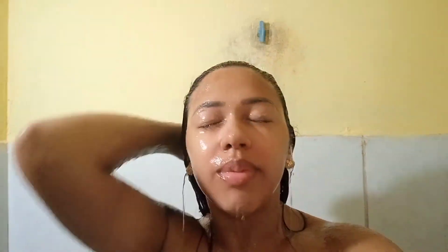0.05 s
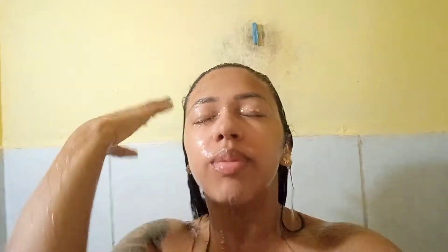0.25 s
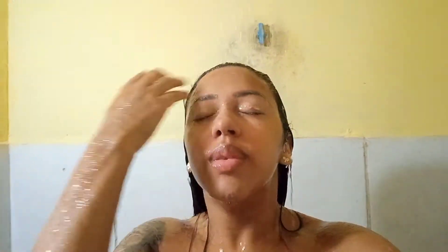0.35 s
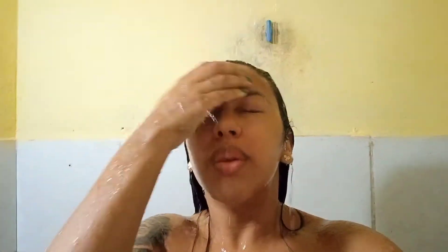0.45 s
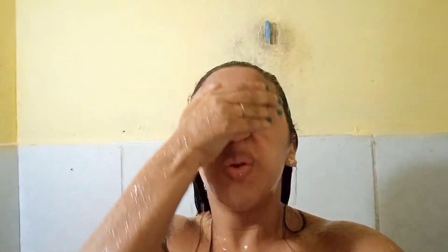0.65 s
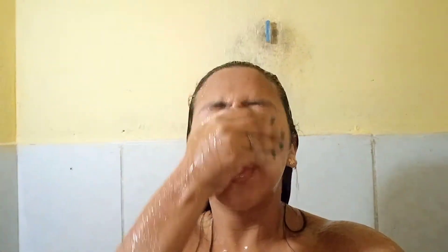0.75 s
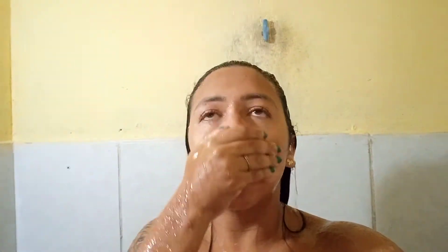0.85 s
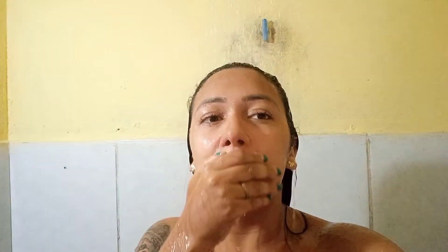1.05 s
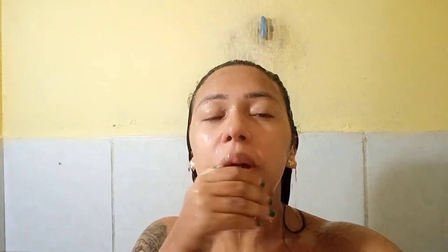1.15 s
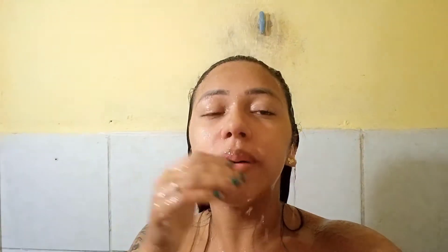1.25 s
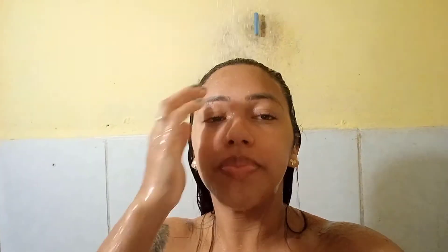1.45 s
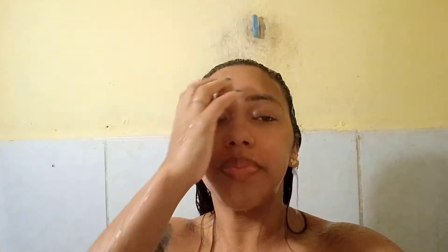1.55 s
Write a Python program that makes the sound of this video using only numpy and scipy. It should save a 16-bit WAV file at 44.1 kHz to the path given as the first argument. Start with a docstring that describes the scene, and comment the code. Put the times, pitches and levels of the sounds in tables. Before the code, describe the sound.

Close stereo pickup of a shower running over someone: thin crackling spray, an abrupt splash of shed water near the start, another splashy swell midway, then gurgling drips and a faint squelch, ringing off hard walls.

```python
"""A small tiled bathroom: shower water falls near a two-port phone. A fine spray patters throughout, built from
random clicks and hiss; water shed from hair, arm and hand lands in splats and one heavy slosh, both made of click
clusters. Air pockets ring as rising sines and a wet palm squelches over the face as filtered patter.
The hard walls ring on as decaying noise, unrelated at the two ports except in the bass; the shower corner hums
over a faint low rumble."""
import sys
import numpy as np
from scipy import signal
from scipy.fft import rfft, irfft, next_fast_len
from scipy.io import wavfile
from scipy.ndimage import uniform_filter1d

SR = 44100
rng = np.random.default_rng(int(sys.argv[2]) if len(sys.argv) > 2 else 0)


def log_audio(samples):
    """Write samples as a 16-bit WAV file to the path given in sys.argv[1]."""
    # one column per channel
    frames = np.atleast_2d(samples).T
    # limit to full scale, then quantise
    limited = np.clip(frames, -1, 1)
    pcm = np.round(limited * 32767).astype(np.int16)
    wavfile.write(sys.argv[1], SR, pcm)


def elevation(decibels):
    """Turn decibel levels (scalar or array-like) into linear amplitude ratios."""
    levels = np.asarray(decibels, float)
    return 10 ** (levels / 20)


N = 70560  # length [samples]
T = np.arange(N) / SR  # [s]
SIZE = next_fast_len(2 * N)  # transform length, with space for the echoes
HZ = np.maximum(np.arange(SIZE // 2 + 1) * SR / SIZE, 1)

# spray strength ahead of the room, as the body moves under the jet: (time [s], level [dB])
SPRAY_STRENGTH = [(0.0, -40.5), (.13, -39), (0.186, -30.5), (0.316, -55), (.54, -36.5), (.65, -34),
                  (.69, -27), (0.81, -35), (.95, -34.5), (1.158, -33), (1.354, -37), (1.46, -35),
                  (1.6, -40.5)]
# spray colour: (frequency [Hz], relative gain [dB])
SPRAY_COLOUR = [(180, -22), (300, -26.5), (450, -23), (638, -18), (793, -15.5), (1000, -17), (1550, -8),
                (3840, -11), (7130, -4), (8020, -11.5), (13300, -1), (15400, -7.5), (16500, -20)]
DROPS_PER_S, DROP_SPREAD_DB = 2500, 3.5
HISS_DB, FLICKER_DB = -12.5, 5  # hiss against the drops; spread of the flicker

# decay of the room: (frequency [Hz], time to fall 60 dB [s])
ROOM_DECAY = [(200, 0.46), (800, 0.56), (3000, 0.5), (7000, 0.38), (13000, 0.65)]
ROOM_BUILD_S, SHARED_BELOW_HZ = 0.0019, 695
EARLY_DB, EARLY_S = -9.5, 0.0021  # nearest tiles: level ahead of the build-up, decay time
NICHE_HZ, NICHE_WIDTH_HZ, NICHE_DB = 768.7, 21, -7  # air resonance of the shower corner
MODE_HZ, MODE_WIDTH_HZ, MODE_DB = 234.5, 15, 7.5  # low standing wave between the walls

# hum of the corner, kept going by the falling stream: (time [s], level before the sway [dB])
HUM_STRENGTH = [(0.0, -60), (0.222, -59), (0.27, -36.5), (0.49, -71), (0.646, -45.5), (0.73, -70.5),
                (1.154, -51), (1.256, -63.5), (1.558, -55), (1.6, -61)]
HUM_WIDTH_HZ, HUM_SWAY_DB = 69, 4.5  # width of each of two filter passes

# rumble of building and pipes: (frequency [Hz], relative gain [dB])
RUMBLE_COLOUR = [(15, -46), (25, -16), (65, -5), (188, -14), (246, 0), (314, -10), (400, -13), (520, -43),
                 (880, -120)]
RUMBLE_DB = -66  # before its slow sway

# splats of shed water on the tiles, ahead of the direct and room paths:
# (time [s], level [dB], centre [Hz], width [share of centre], length [s])
TILE_SPLATS = [(0.015, -37.5, 11600, 0.17, 0.002), (.145, -39, 7430, 0.1, 0.0097),
               (.146, -32.5, 12600, 0.33, 0.0085), (0.19, -31, 12000, 0.22, 0.0017),
               (.202, -29.5, 12000, 0.41, 0.0027), (.203, -29.5, 4560, 0.82, 0.021),
               (.22, -40, 4970, 2.3, 0.012), (0.21, -28, 7200, 0.17, 0.016),
               (0.231, -18.5, 12700, 4.2, .006), (.256, -18, 13160, 0.26, 0.0014),
               (0.559, -34, 12100, 0.12, 0.0027), (.573, -41, 11900, 0.28, .002),
               (.600, -37.5, 12900, .3, 0.0015), (0.593, -27.5, 4340, 0.63, 0.039),
               (0.674, -21, 12000, 1.55, 0.022), (0.705, -25, 6900, 3.9, 0.0056),
               (.768, -27.5, 4100, 1.5, 0.0016), (.776, -29.5, 4310, .35, 0.018),
               (0.772, -25.5, 12900, 0.26, 0.00099), (0.804, -25.5, 12000, 3, .004),
               (.850, -26.5, 13400, 0.68, 0.0033), (0.957, -30.5, 12150, 0.34, 0.0035),
               (0.976, -33, 7200, 0.36, 0.0048), (1.088, -33, 13300, 0.2, 0.0026),
               (1.113, -35.5, 2800, 0.88, 0.0055), (1.15, -30.5, 11700, 0.66, 0.0024),
               (1.276, -48, 3780, 0.16, 0.011), (1.297, -32.5, 6460, 0.24, 0.021),
               (1.344, -26, 13100, 1.1, 0.002), (1.472, -24, 9650, 1.13, 0.056),
               (1.494, -35.5, 5100, 0.56, 0.005), (1.395, -32, 12300, 0.27, 0.0046),
               (1.530, -32.5, 12500, 0.99, .006), (1.570, -28.5, 12500, 0.97, 0.0026)]
SPLAT_GRAINS_PER_S, SPLAT_SPREAD_DB = 7000, 0.5
SPREAD_S = 0.0026  # longest time constant of a cluster's swell
FIRST_DROP_DB = -7  # energy of the leading drop against its cluster
SPLAT_DIRECT_DB = -3

# air pockets, ahead of the direct and room paths:
# (time [s], level [dB], starting pitch [Hz], time to fall 60 dB [s], swell [s])
AIR_POCKETS = [(.143, -39.5, 1453, 0.18, .002), (.146, -32.5, 2520, 0.014, 0.0012),
               (.172, -32.5, 2420, .02, 0.0015), (.689, -25, 2608, 0.037, 0.0025),
               (.904, -32, 2340, 0.024, 0.0024), (1.051, -39, 1000, 0.038, 0.014),
               (1.078, -39, 1200, 0.044, 0.0033), (1.075, -40, 327, 0.06, 0.027),
               (1.121, -34.5, 397, 0.028, 0.0014), (1.123, -31.5, 2450, 0.032, 0.0022),
               (1.129, -33, 3540, .02, 0.0015), (1.142, -31.5, 1410, 0.027, 0.0016),
               (1.152, -36, 498, 0.037, 0.0034), (1.160, -38.5, 1560, 0.076, 0.007),
               (1.170, -35.5, 1668, 0.057, .002), (1.175, -40, 560, .04, .003),
               (1.186, -33, 1680, 0.018, 0.0018), (1.236, -46.5, 514, 0.15, 0.003),
               (1.257, -40.5, 1393, 0.037, .002), (1.278, -36.5, 3820, .03, 0.0015),
               (1.287, -34, 3730, 0.036, 0.0012), (1.385, -36, 1525, 0.027, 0.0015),
               (1.460, -43.5, 2170, 0.053, 0.0049)]
BUBBLE_RISE = 0.14  # glide strength: pitch climbs by twice this share
BUBBLE_DIRECT_DB, BUBBLE_ROOM_DB = -2, -7  # sends, also used for the squelch

# lumps of water in the heavy slosh off the raised arm: (time [s], gain [dB], length [s])
SLOSH_LUMPS = [(0.2474, -11.5, 0.01), (0.268, -10, 0.0098), (0.285, -33, 0.0046)]
# slosh colour: (frequency [Hz], relative gain [dB])
SLOSH_TONE = [(88, -36), (150, -27), (299, -27), (409, -18.5), (669, -6), (767, -3.5), (880, -10),
              (1140, -12.5), (2920, 1), (3450, 0), (4300, 3), (5590, -1), (6810, 3.5), (8130, -4.5),
              (15000, -3), (16500, -42)]

# wet palm: centre time, half-width of the swell, level ahead of swell and sends, pitch region
SQUELCH_S, SQUELCH_LEN_S, SQUELCH_DB, SQUELCH_HZ = 1.151, 0.053, -44.5, 470

SPOTS = 4  # landing places, each with its own echoes
# colour difference of the ports: (frequency [Hz], left minus right [dB])
PORT_DIFFERENCE = [(60, 3), (110, 0), (200, 0.5), (380, 2), (700, -2.5), (1290, -6), (2380, -6.0),
                   (4400, -7), (8120, -5.5), (15000, -9.5)]
TOP_HZ = 16050  # nothing passes above


def level(x, db):
    """Scale to an rms level."""
    return x * elevation(db) / np.sqrt(np.mean(x ** 2))


def on_hz(table):
    """Read (frequency [Hz], value) points on a log-frequency axis."""
    f, v = np.array(table, float).T
    return np.interp(np.log(HZ), np.log(f), v)


def shape(x, gain):
    """Apply a frequency response."""
    return irfft(rfft(x, SIZE) * gain, SIZE)[..., :N]


def band(hz, width_hz):
    """Causal resonance, gain 1 at the centre."""
    return 1 / (1 + 1j * (HZ / hz - hz / HZ) * hz / width_hz)


def octave(hz):
    """Soft bell about an octave wide, gain 1 at the centre."""
    return np.exp(-np.log2(HZ / hz) ** 2 * 2)


def patter(per_s, spread_db):
    """Random droplet clicks with a long tail of big ones; rms 1."""
    hit, size, sign = rng.random((3, N))
    clicks = (hit < per_s / SR) * elevation(-spread_db * np.log(size + 1e-9))
    return level(clicks * np.sign(sign - .5), 0)


def walk(rate):
    """Slow random wander, spread near 1, with rate new values a second."""
    k = int(SR / rate)
    steps = np.repeat(rng.standard_normal(N // k + 1), k)
    return np.sqrt(1.5) * uniform_filter1d(steps, k)[:N]


def spray():
    """Fine drops and hiss; octave bands flicker on their own."""
    out = 0
    for hz in 250 * 2. ** np.arange(7):
        raw = patter(DROPS_PER_S, DROP_SPREAD_DB) + elevation(HISS_DB) * rng.standard_normal(N)
        out = out + shape(raw, octave(hz)) * elevation(FLICKER_DB * walk(14.19))
    t, db = np.array(SPRAY_STRENGTH).T
    coloured = level(shape(out, elevation(on_hz(SPRAY_COLOUR))), 0)
    return coloured * elevation(np.interp(T, t, db))


def room():
    """Responses to the two ports: a quick flutter off the nearest tiles, then a tail that decays band by band."""
    shared, own = rng.standard_normal(N), rng.standard_normal((2, N))
    mix = 1 / (1 + (HZ / SHARED_BELOW_HZ) ** 4)
    noise = shape(shared, np.sqrt(mix)) + shape(own, np.sqrt(1 - mix))
    t60, tail = on_hz(ROOM_DECAY), 0
    for hz in 125 * 2. ** np.arange(8):
        t = t60[int(hz * SIZE / SR)]
        decay = np.exp(-np.log(1000) * T / t) / np.sqrt(t * SR / 10)
        tail = tail + shape(noise, octave(hz)) * decay
    tail = tail + elevation(EARLY_DB) * noise * np.exp(-T / EARLY_S) / np.sqrt(EARLY_S * SR / 2)
    tail = tail * (1 - np.exp(-T / ROOM_BUILD_S))
    niche = elevation(NICHE_DB) * band(NICHE_HZ, NICHE_WIDTH_HZ)
    mode = elevation(MODE_DB) * band(MODE_HZ, MODE_WIDTH_HZ)
    return rfft(tail, SIZE) * (1 + niche + mode)


def hum():
    """The air of the shower corner resonates: noise in a narrow band, swaying in level."""
    tone = level(shape(rng.standard_normal(N), band(NICHE_HZ, HUM_WIDTH_HZ) ** 2), 0)
    t, db = np.array(HUM_STRENGTH).T
    return tone * elevation(np.interp(T, t, db) + HUM_SWAY_DB * walk(11.4))


def rumble():
    """Building and pipes: low noise, separate at each port, with one common sway in level."""
    low = shape(rng.standard_normal((2, N)), elevation(on_hz(RUMBLE_COLOUR)))
    return level(low, RUMBLE_DB) * elevation(3.0 * walk(8))


def burst(at_s, len_s):
    """Quick swell, then an exponential fall."""
    u = np.maximum(T - at_s, 0)
    return (1 - np.exp(-u / min(SPREAD_S, len_s))) * np.exp(-u / max(len_s, 1e-3))


def lump(grains, at_s, len_s, db):
    """A leading drop and a falling cluster of clicks behind it; set cluster energy (dB over 5 ms)."""
    cluster = grains * burst(at_s, len_s)
    cluster = cluster / np.sqrt(np.sum(cluster ** 2))
    first_drop = elevation(FIRST_DROP_DB) * (np.abs(T - at_s) * SR <= .5)
    return (cluster + first_drop) * elevation(db) * np.sqrt(SR / 200)


def splats(rows):
    """Each splat is a short cluster of droplet clicks with its own colour."""
    grains = patter(SPLAT_GRAINS_PER_S, SPLAT_SPREAD_DB)
    out = 0
    for at_s, db, hz, width, len_s in rows:
        width_hz = width * hz
        splat = shape(lump(grains, at_s, len_s, db), band(hz, width_hz) ** 2)
        out = out + splat * np.sqrt(SR / width_hz)  # makes up for a narrow band
    return out


def bubbles(rows):
    """Air pockets swell and ring as damped sines that glide up in pitch."""
    out = 0
    for at_s, db, hz, t60, swell_s in rows:
        u = np.maximum(T - at_s, 0)
        decay = np.exp(-np.log(1000) * np.maximum(u - swell_s, 0) / t60)
        env = np.minimum(u / swell_s, 1) * decay
        glide = 1 + BUBBLE_RISE * np.minimum(u / (t60 + swell_s), 1)
        out = out + elevation(db) * env * np.sin(2 * np.pi * hz * u * glide)
    return out


def slosh():
    """Dense lumps of water hit the floor: clicks and noise in bursts, drawn afresh for every spot."""
    grains = patter(SPLAT_GRAINS_PER_S, SPLAT_SPREAD_DB) + elevation(5.0) * rng.standard_normal(N)
    lumps = sum(elevation(db) * grains * burst(at_s, len_s) for at_s, db, len_s in SLOSH_LUMPS)
    colour = elevation(on_hz(SLOSH_TONE))
    return shape(lumps, colour / np.sqrt(np.mean(colour ** 2)))


def squelch():
    """Soft wet rub of the palm: low filtered patter under a smooth swell; one spot's share."""
    rub = level(shape(patter(750, 0.62), band(SQUELCH_HZ, 690) ** 2), SQUELCH_DB)
    return rub / np.sqrt(SPOTS) * np.exp(-((T - SQUELCH_S) / SQUELCH_LEN_S) ** 2)


def scene():
    """Water lands at several spots and rings through the room, over the corner hum and a faint low rumble."""
    wet, lead = 0, N // 10
    for k in range(SPOTS):
        fine, walls = spray() / np.sqrt(SPOTS), room()
        near = bubbles(AIR_POCKETS[k::SPOTS]) + squelch()
        hits = splats(TILE_SPLATS[k::SPOTS])
        into_room = fine + hits + slosh() / np.sqrt(SPOTS) + elevation(BUBBLE_ROOM_DB) * near
        wet = wet + shape(into_room, walls)
        wet = wet + elevation(BUBBLE_DIRECT_DB) * near + elevation(SPLAT_DIRECT_DB) * hits
        # spray that fell just before the first moment still rings: the opening, reversed, stands in for it
        earlier = fine[lead:0:-1]
        wet = wet + irfft(rfft(earlier, SIZE) * walls, SIZE)[:, lead:lead + N]
    return wet + rumble() + hum()


def roll_off(x):
    """The treble ends steeply here."""
    return signal.sosfilt(signal.butter(12, 16900, fs=SR, output="sos"), x)


def record(dry):
    """The two ports differ in colour and the top is cut."""
    tilt_db = on_hz(PORT_DIFFERENCE) / 2
    port_gain = elevation(np.array([tilt_db, -tilt_db])) * (HZ < TOP_HZ)
    mix = shape(dry, port_gain)
    return roll_off(mix)


dry = scene()
out = record(dry)
log_audio(out)
```